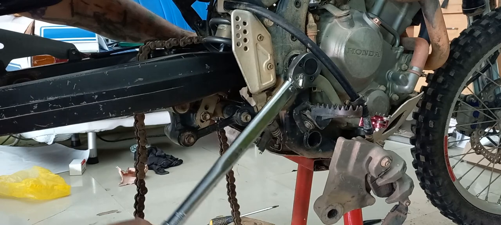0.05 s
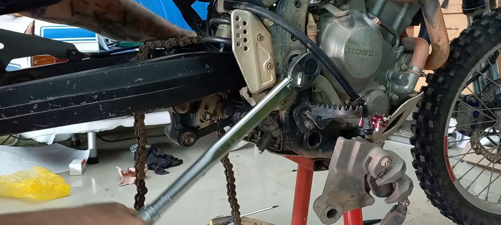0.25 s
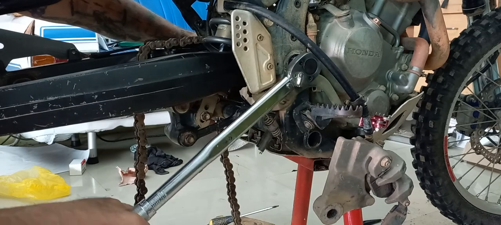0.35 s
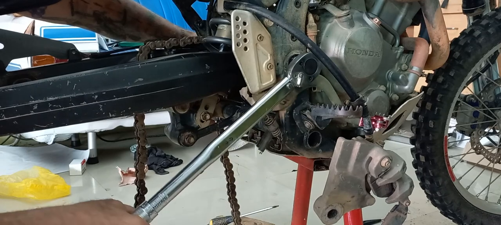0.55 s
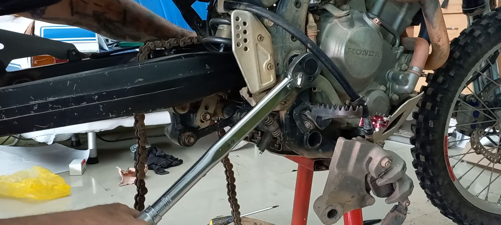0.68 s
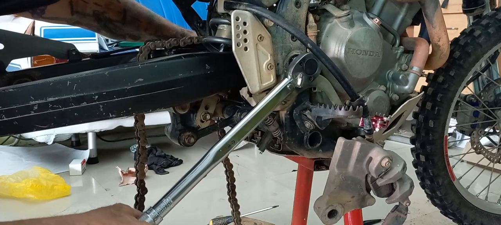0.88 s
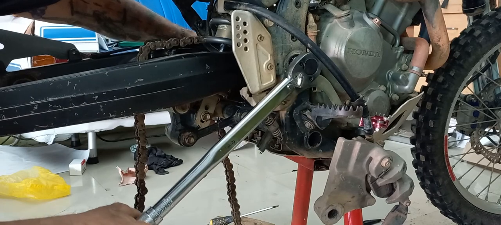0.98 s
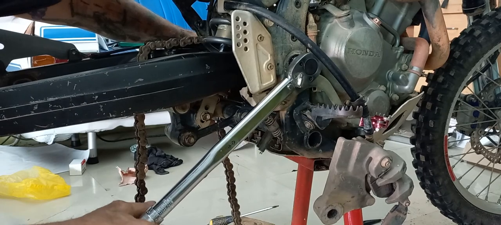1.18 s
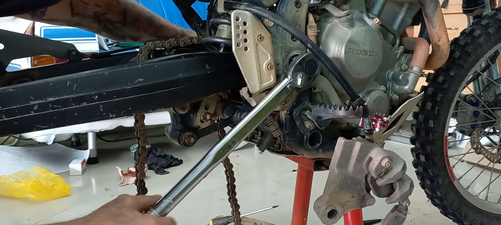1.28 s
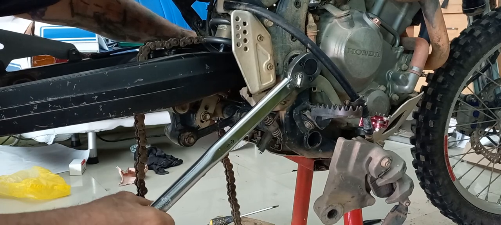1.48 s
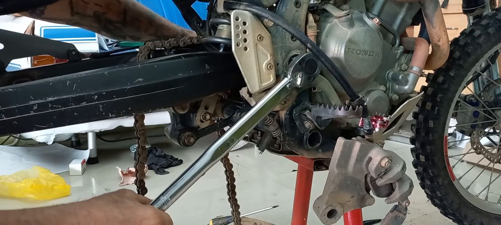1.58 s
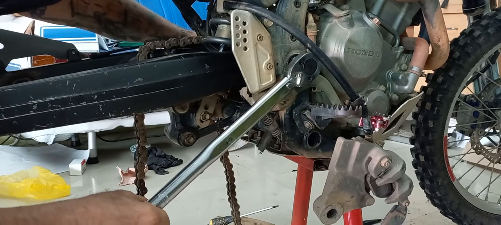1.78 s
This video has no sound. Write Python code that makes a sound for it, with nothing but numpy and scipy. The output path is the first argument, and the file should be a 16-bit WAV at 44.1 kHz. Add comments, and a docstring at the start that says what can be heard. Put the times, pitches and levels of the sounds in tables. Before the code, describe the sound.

A seized bolt cracks loudly twice under a wrench, followed by faint metal clicks.

```python
"""Loosening a seized bolt

A long wrench is leaned on a seized motorcycle bolt in a hard-walled workshop. The bolt gives twice:
each sudden release is an impulse that rattles the machine, rings the frame and fills the room.
The loose socket and handle clack softly as the load shifts. Underneath lie a low hum and rumble,
a faint ring of the handle and two dull bumps."""
import sys
import numpy as np
from scipy import signal
from scipy.fft import rfft, irfft
from scipy.io import wavfile

SR = 44100
rng = np.random.default_rng(int(sys.argv[2]) if len(sys.argv) > 2 else 0)


def wav_out(sig):
    """Save sig, one row per channel (or a flat mono array), as 16-bit PCM at SR to the path in sys.argv[1]."""
    wavfile.write(sys.argv[1], SR, np.round(np.clip(np.atleast_2d(sig).T, -1, 1) * 32767).astype(np.int16))


N = 81585
TIME = np.arange(N) / SR
FREQS = np.maximum(np.arange(N + 1) * SR / (2 * N), 1)
# left-right coherence of the diffuse field: f/Hz, correlation
COHERENCE = [(60, .88), (130, .8), (290, .8), (640, .62), (1410, .1), (3100, 0)]


def from_db(db):
    """Amplitude ratio of a level: 20 dB to a factor of ten."""
    return 10 ** (np.asarray(db) / 20)


def at_hz(points, hz):
    """Interpolation of (frequency, value) pairs on a logarithmic frequency axis."""
    f, v = np.transpose(points)
    return np.interp(np.log(hz), np.log(f), v)


def decay(t60):
    """Exponential damping: 60 dB in t60 seconds, down to -240 dB."""
    return from_db(-60 * np.minimum(TIME / t60, 4))


def filtered(x, response):
    """Convolution theorem: filtering multiplies the spectrum by a frequency response."""
    return irfft(rfft(x, 2 * N) * response)[..., :N]


def minimum_phase(db):
    """Causal response with the given levels, found by folding the cepstrum onto positive time."""
    cepstrum = irfft(np.log(from_db(db)))
    cepstrum[1:N] *= 2
    cepstrum[N + 1:] = 0
    return np.exp(rfft(cepstrum))


def add(out, sound, t):
    """Superposition of a sound beginning at time t, which may be negative."""
    i = int(round(t * SR))
    out[:, max(i, 0):N + min(i, 0)] += sound[..., max(-i, 0):N - max(i, 0)]


def diffuse_spectrum():
    """White noise in a diffuse field: two microphones agree in the bass, but not in the treble."""
    mid, side = rfft(rng.standard_normal((2, 2 * N)))
    coherence = at_hz(COHERENCE, FREQS)
    return (np.sqrt(1 + coherence) * mid + np.sqrt(1 - coherence) * side * [[1], [-1]]) / np.sqrt(2)


def dense_decay(t60s, rise_s, bands=16):
    """Overlapping modes or echoes sum to noise; each band has unit gain and its own decay rate."""
    noise, out = diffuse_spectrum(), 0
    edges = np.r_[0, np.geomspace(200, SR / 2, bands)]
    for low, high in zip(edges, edges[1:]):
        envelope = (1 - np.exp(-TIME / rise_s)) * decay(at_hz(t60s, (low + high) / 2))
        band = irfft(noise * ((FREQS >= low) & (FREQS < high)))[:, :N] * envelope
        energy = np.sum(band ** 2, axis=1, keepdims=True)
        out = out + band * np.sqrt(2 * (high - low) / SR / energy)
    return out


def mode(hz, db, t60):
    """A damped oscillator; lower coherence sets its phases at the two microphones further apart."""
    spread = np.arccos(at_hz(COHERENCE, hz)) / 2 * rng.choice([-1, 1])
    phase = rng.uniform(0, 2 * np.pi) + spread * np.array([[1], [-1]])
    return from_db(db) * decay(t60) * np.sin(2 * np.pi * hz * TIME + phase)


def rumble():
    """Workshop noise with its power concentrated in the bass and a slowly drifting level."""
    # noise spectrum: f/Hz, level/dB in a 1 Hz band before the drift
    density = [(25, -107), (40, -98), (60, -74.5), (100, -75), (170, -73.5), (260, -80.5), (450, -82),
               (750, -90.5), (1500, -95), (2300, -102), (3200, -112), (6000, -119), (15000, -121)]
    # drift: t/s, relative level/dB
    drift = [(0, 3), (.35, 1), (.65, 0.5), (1, -1), (1.2, -1.5), (1.38, -2), (1.5, -1.5), (1.85, -1)]
    noise = irfft(diffuse_spectrum() * from_db(at_hz(density, FREQS)))[:, :N] * np.sqrt(SR / 2)
    return from_db(np.interp(TIME, *np.transpose(drift))) * noise


def hum(hz=122.7, db=-53.5, depth=0.9, waver_hz=7):
    """A low tone wavers under slow random modulation of amplitude and phase."""
    waver = irfft(rfft(rng.standard_normal((2, 2 * N))) / (1 + (FREQS / waver_hz) ** 2))[:, :N]
    swell, phase = depth * waver / waver.std()
    return from_db(db) * np.sqrt(2) * (1 + swell) * np.sin(2 * np.pi * hz * TIME + phase)


def bumps(hz=136, width_s=.007):
    """A low tone under a Gaussian envelope of a few cycles is heard as a dull thud."""
    # soft thuds: t/s, level/dB
    thuds = [(1.35, -50.5), (1.631, -40)]
    pulse = np.exp(-(TIME / width_s - 1) ** 2) * np.sin(2 * np.pi * hz * TIME)
    out = np.zeros((2, N))
    for t, db in thuds:
        add(out, from_db(db) * pulse, t)
    return out


def workshop_response():
    """Reverberation: reflections from hard walls build up into a diffuse, decaying field."""
    # reverberation time: f/Hz, T60/s
    t60s = [(150, 0.55), (500, 0.79), (1200, 0.6848), (2500, 0.81), (4500, 0.7239), (8000, 0.66),
            (11000, 0.52), (15000, 0.45)]
    # reverberant spectrum: f/Hz, level/dB
    colour = [(100, 1), (350, 3), (1000, 4.5), (2000, 2), (4000, 2.5), (8000, 0), (15000, -0.5)]
    return filtered(dense_decay(t60s, rise_s=0.007), minimum_phase(at_hz(colour, FREQS)))


def handle_ring():
    """Free vibration of the handle, faint and fading from the start."""
    # handle modes: f/Hz
    modes_hz = [320, 515, 600, 1156, 1990, 2065, 2735]
    # their initial strengths: level/dB
    modes_db = [-52.5, -49, -49.5, -58.5, -58.5, -55.5, -61]
    return sum(mode(hz, db, t60=.6) for hz, db in zip(modes_hz, modes_db))


def socket_clacks(room):
    """Impact excitation: as play is taken up, loose steel parts chatter and ring socket and handle."""
    # modes of socket and handle: f/Hz
    modes_hz = [260, 430, 600, 755, 1150, 1490, 1800, 2000, 2125, 2730, 3330, 3975, 5150, 7130, 7650, 8680,
                11200, 12400]
    # their resonance peaks: level/dB
    modes_db = [-1, 0.5, -0.5, 6.5, 1.5, 4, 1.5, 7.5, 5.5, 4.5, -7.5, 1.5, -11.5, -6.5, -6.5, -9, -5.5, -14]
    # their damping: T60/s
    modes_t60 = [.02, .03, .04, 0.06, 0.088, 0.046, .03, 0.045, 0.011, 0.18, 0.0077, .15, .04, .05, .03,
                 .015, .045, .05]
    # decay of the chatter: f/Hz, T60/s
    chatter_t60 = [(400, 0.087), (2000, 0.034), (8000, 0.1)]
    # contacts: t/s, level/dB, roll-off f/Hz, rise time/s, relative room level/dB
    clacks = [(-.06, -6.5, 1900, 0.0036, 4), (0.4789, 1, 2400, 0.0015, -6.5),
              (0.9355, 2, 2566, 0.0019, -7.5), (1.4440, 2, 14000, 0.0022, -1),
              (1.5210, 1.5, 2660, 0.0021, -15), (1.678, 2, 6120, 0.0032, -3),
              (1.7340, -14.5, 14100, 0.00082, -14)]
    power = from_db(-24) ** 2  # broadband tick beneath the resonances
    for hz, db, t60 in zip(modes_hz, modes_db, modes_t60):
        detuning = np.pi * t60 / np.log(1000) * (FREQS - hz ** 2 / FREQS)
        power = power + from_db(db) ** 2 / (1 + detuning ** 2)
    out = np.zeros((2, N))
    for t, db, rolloff_hz, rise_s, room_db in clacks:
        contact_db = db - 10 * np.log10(1 + (FREQS / rolloff_hz) ** 3)
        response = minimum_phase(10 * np.log10(power) + contact_db)
        chatter = dense_decay(chatter_t60, rise_s, bands=5)
        add(out, filtered(chatter + from_db(room_db + 1) * room, response), t)
    return out


def frame_ring(crack):
    """Modal superposition: each crack excites the same modes of frame and wrench in a different mix."""
    # modes of frame and wrench: f/Hz
    modes_hz = [319, 372, 472, 582, 710, 763, 909, 964, 1113, 1289, 1891, 2363, 2549, 2870, 4030, 4195,
                5298, 7600, 8425, 8660]
    # their initial strengths, a row per crack: level/dB
    modes_db = [
        [-37.5, -32, -42.5, -31, -40, -41, -37.5, -34, -32.5, -29, -37, -35.5, -40.5, -32, -53, -43, -39.5,
         -36.5, -45, -32.5],
        [-31, -32.5, -31, -39.5, -34.5, -30.5, -31, -35.5, -37.5, -46.5, -33, -35, -44.5, -51.5, -37, -36.5,
         -54.5, -43, -46, -54],
    ]
    # their damping: T60/s
    modes_t60 = [.45, 0.54, .55, 0.61, .6, 0.27, .55, 0.81, 0.79, 0.61, .65, .5, .45, .45, 0.57, 0.37, 0.65,
                 .25, .45, .45]
    return sum(mode(hz, db, t60) for hz, db, t60 in zip(modes_hz, modes_db[crack], modes_t60))


def thread_slips(response):
    """Stick-slip friction: the thread snaps free and catches again in brief bursts of noise."""
    # slips: t/s, relative level/dB
    slips = [(.2122, -3.5), (0.212, -1.5), (0.215, -11.5), (0.6816, 0), (0.6853, -7.5), (0.6864, -8),
             (.6895, -8.5)]
    out = np.zeros((2, N))
    for t, db in slips:
        burst = irfft(diffuse_spectrum())[:, :N] * decay(t60=.006)
        burst /= np.sqrt(np.sum(burst ** 2) / 2)  # unit mean energy per channel
        add(out, from_db(db) * filtered(burst, response), t)
    return out


def bolt_cracks(room, direct_db=11.5, reverberant_db=14):
    """Impulse response: each release of the bolt is a sharp pulse that excites machine, frame and room."""
    # releases: t/s, relative level/dB, relative room level/dB, (unused), factor on the rattle's T60
    cracks = [(0.2118, 4.5, 3.5, -28, 0.81), (0.6798, 6, -0.5, -22.5, 0.96)]
    # damping of the machine's dense modes: f/Hz, T60/s
    rattle_t60 = [(300, 0.3), (900, 0.21), (2000, 0.15), (5000, 0.03), (15000, .028)]
    # points of the crack spectrum: f/Hz
    spectrum_hz = [60, 200, 260, 320, 400, 500, 680, 850, 980, 1250, 1480, 1700, 1900, 2120, 2450, 3200,
                   3700, 4250, 5100, 6100, 6700, 7500, 8000, 8600, 9400, 10800, 12500, 13500, 14700, 15600,
                   17000]
    # spectrum at those points: level/dB
    spectrum_db = [-25.5, -17.5, -10, 0, 3, -2, 0.5, 1, 4, -0.5, -7, -5, 2, -3.5, -0.5, -3, -4, -2, -7, -8,
                   -5, -1, -5, -0.5, -6, -7.5, -12.5, -13, -13.5, -13.5, -17]
    # emphasised resonances, a row per crack: f/Hz
    peaks_hz = [(1700, 6630, 15550), (820, 1950, 4150)]
    # their boosts, a row per crack: level/dB
    peaks_db = [(11, 17, 5), (5, 4.6, 10)]
    relative_width, room_share = 0.027, .35  # half-width of a boost; share of it that reaches the room
    colour_db = np.interp(np.log(FREQS), np.log(spectrum_hz), spectrum_db)
    out = np.zeros((2, N))
    for crack, (t, db, room_db, _, stretch) in enumerate(cracks):
        boost_db = sum(peak_db / (1 + (np.log(FREQS / hz) / relative_width) ** 2)
                       for hz, peak_db in zip(peaks_hz[crack], peaks_db[crack]))
        vibration = dense_decay([(hz, t60 * stretch) for hz, t60 in rattle_t60], rise_s=0.0001)
        rattle = from_db(direct_db + db) * filtered(vibration, minimum_phase(colour_db + boost_db))
        echoes = filtered(room, minimum_phase(colour_db + room_share * boost_db))
        add(out, rattle + from_db(reverberant_db + room_db) * echoes + frame_ring(crack), t)
    return out + from_db(direct_db) * thread_slips(minimum_phase(colour_db))


def scene():
    """Linear superposition of all sources; cracks and clacks share one reverberant room."""
    room = workshop_response()
    return bolt_cracks(room) + socket_clacks(room) + handle_ring() + bumps() + rumble() + hum()


def record(dry, low_cut_hz=48, high_cut_hz=15750, ceiling=.85):
    """Band limiting and saturation: the microphones lose deep bass, round the peaks and cut the top."""
    highpass = signal.butter(2, low_cut_hz, "high", fs=SR, output="sos")
    lowpass = signal.ellip(12, .2, 80, high_cut_hz, fs=SR, output="sos")
    rounded = ceiling * np.tanh(signal.sosfilt(highpass, dry) / ceiling)
    return signal.sosfilt(lowpass, rounded)


dry = scene()
out = record(dry)
wav_out(out)
```